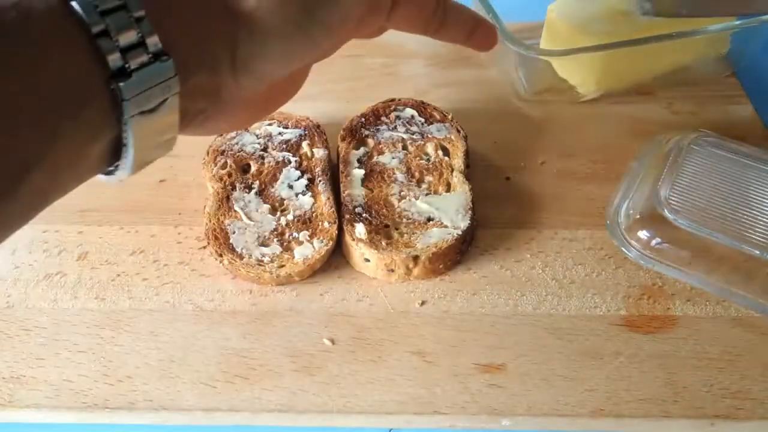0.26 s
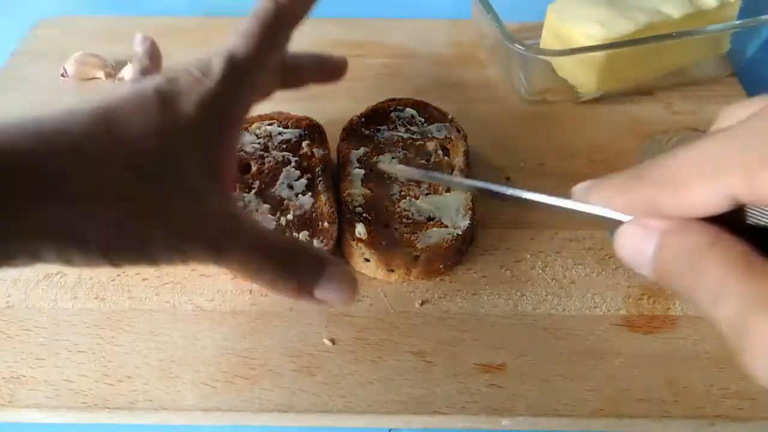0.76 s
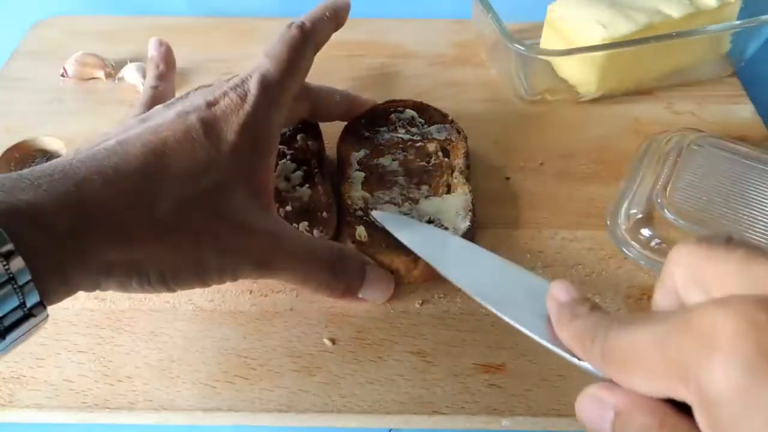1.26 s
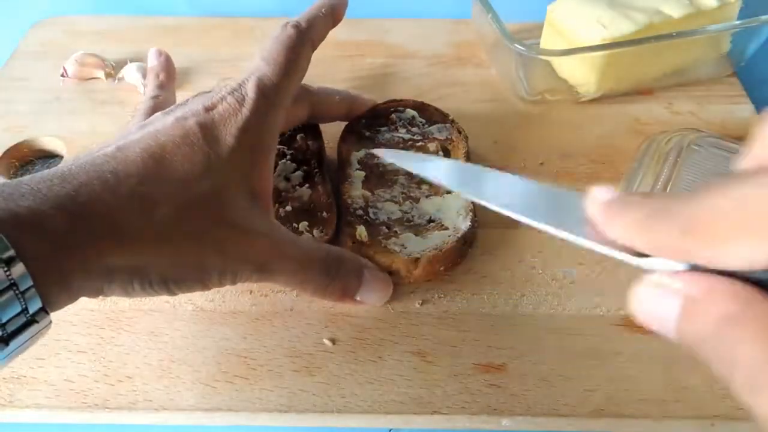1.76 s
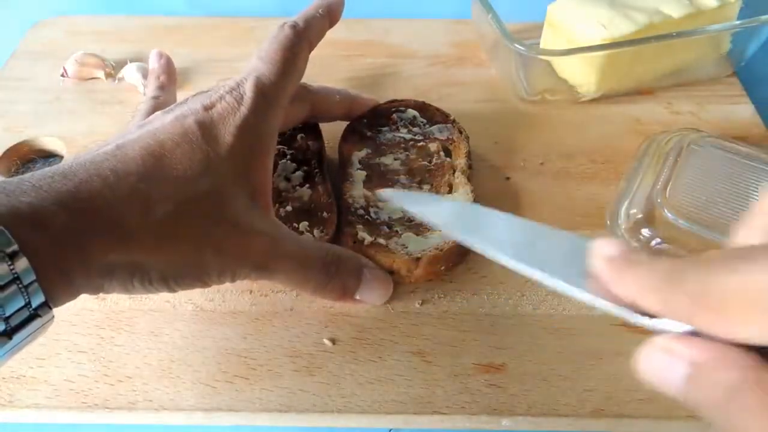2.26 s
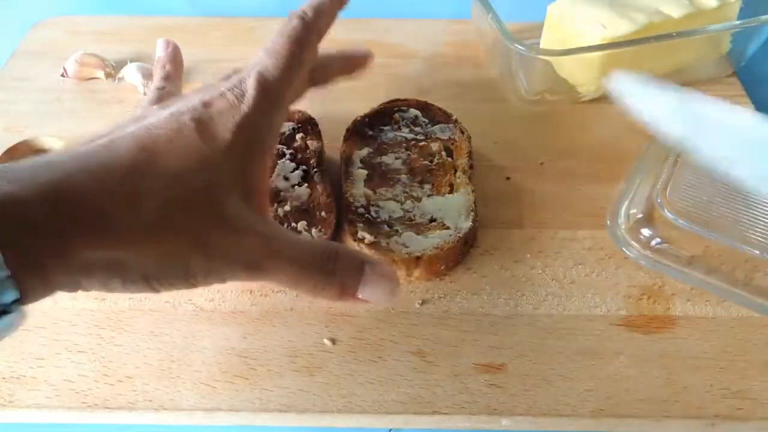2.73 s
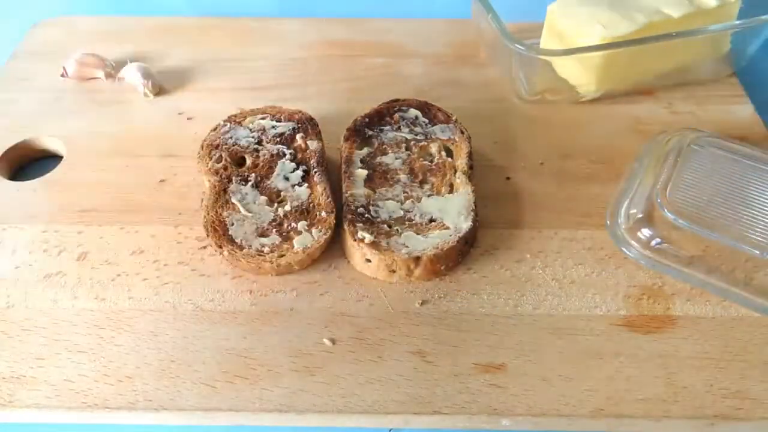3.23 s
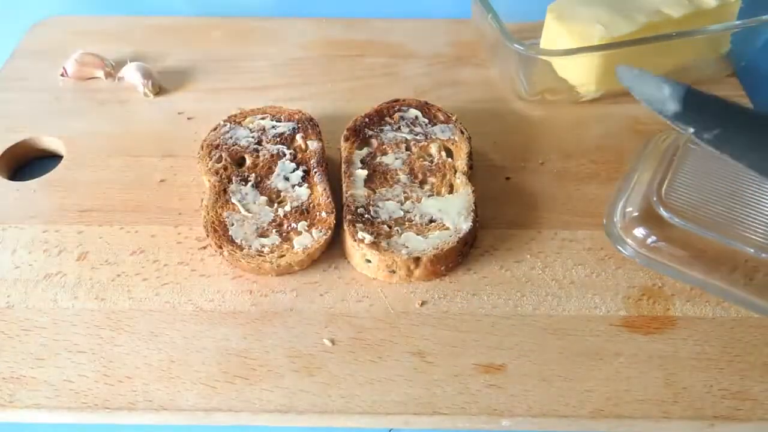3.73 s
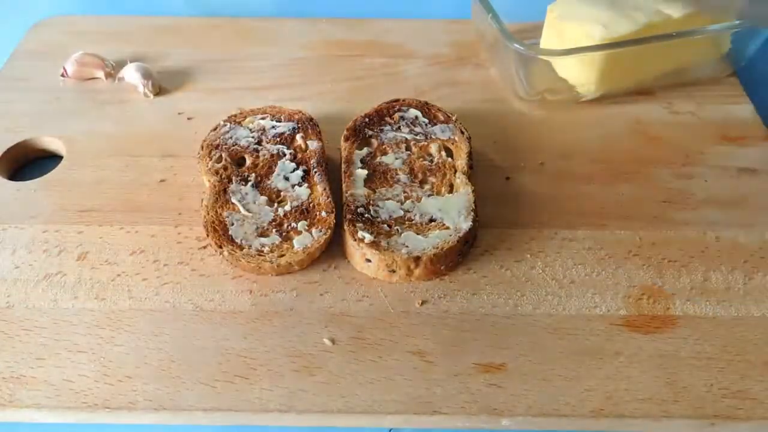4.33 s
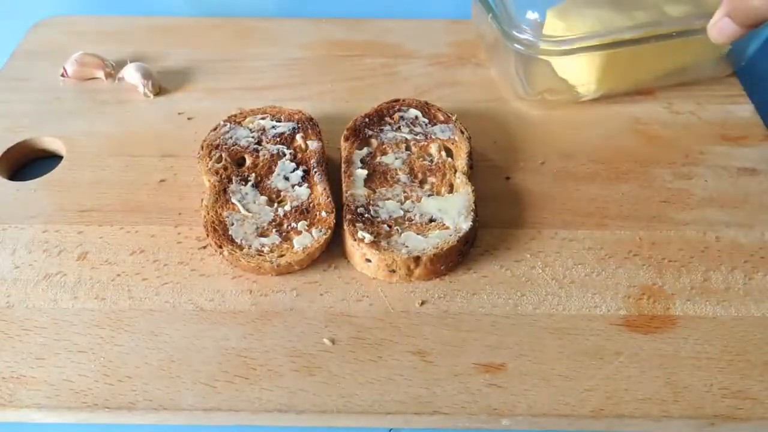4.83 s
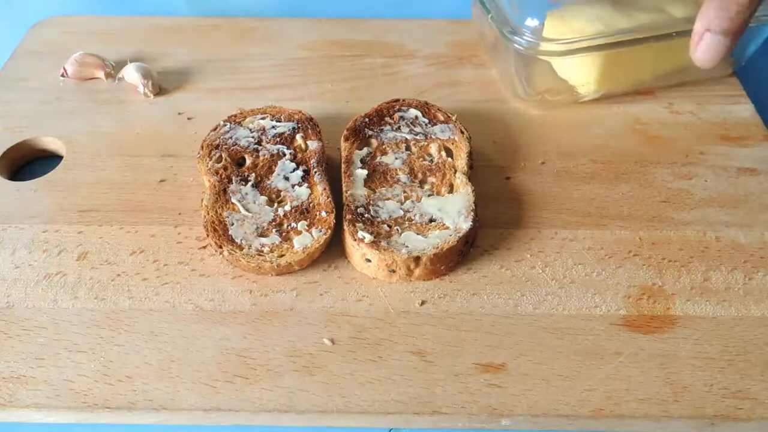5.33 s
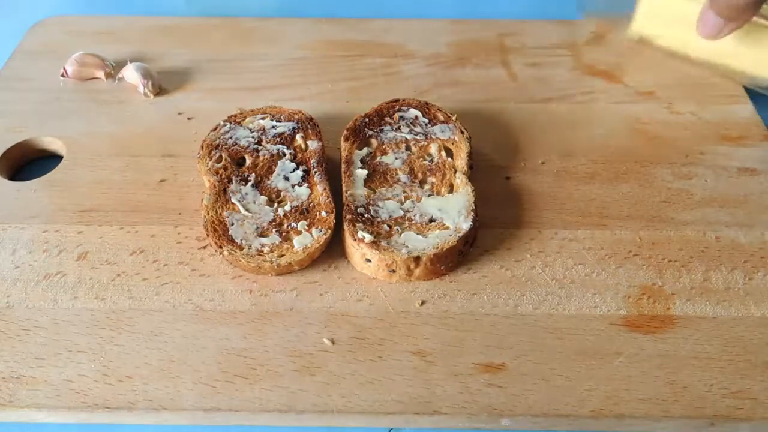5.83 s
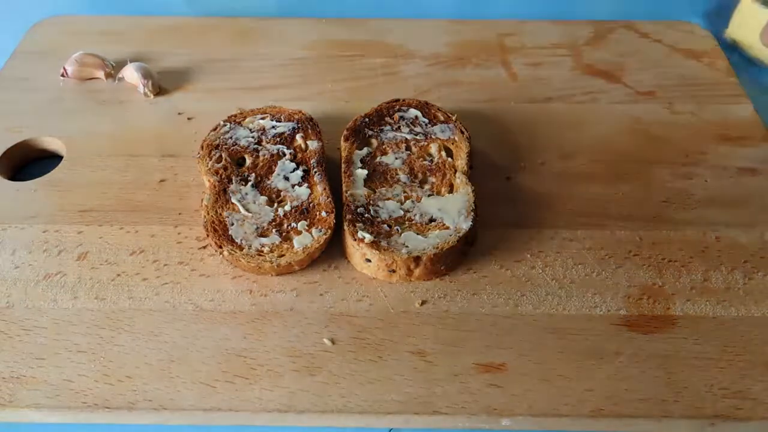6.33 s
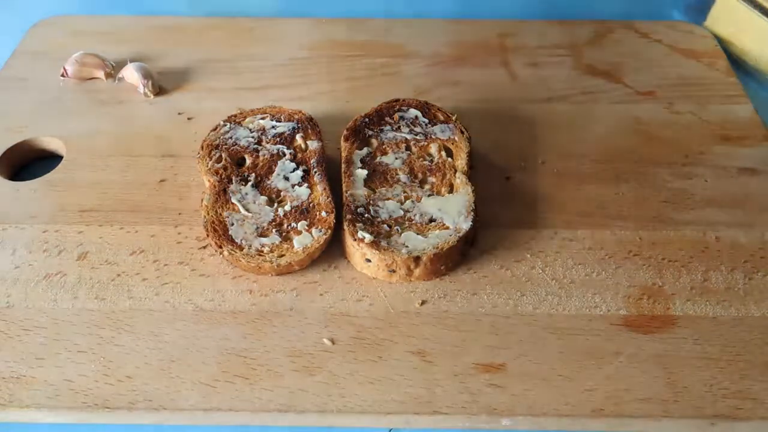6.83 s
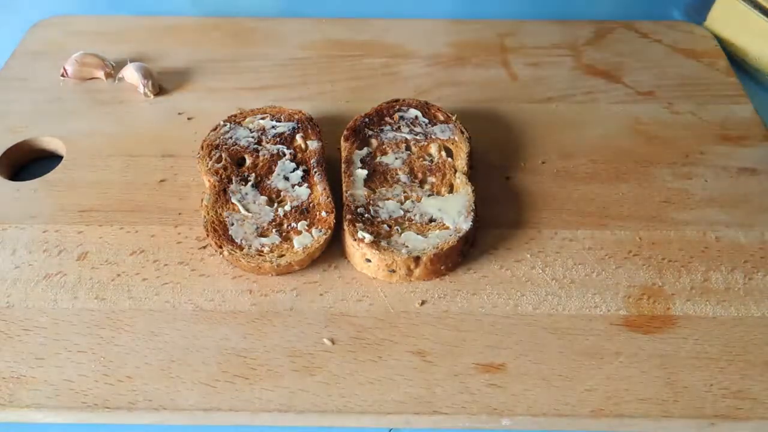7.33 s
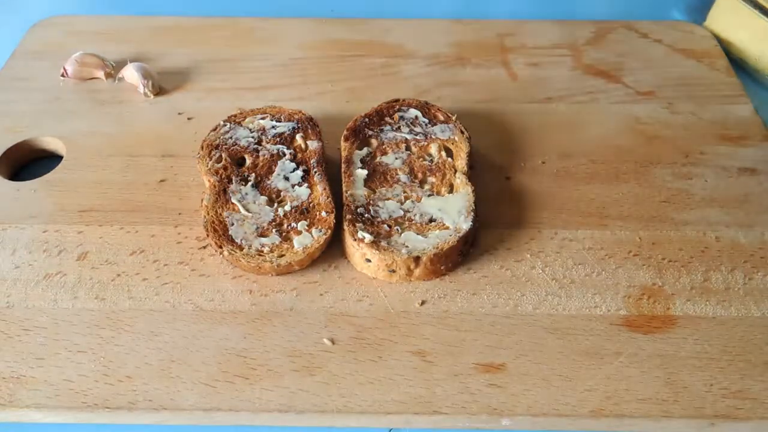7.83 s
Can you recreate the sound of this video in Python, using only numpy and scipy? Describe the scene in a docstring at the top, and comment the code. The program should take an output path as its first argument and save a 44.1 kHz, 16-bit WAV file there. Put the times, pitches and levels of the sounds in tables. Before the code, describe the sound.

Dry, gritty toast scraping, a pause, glass knocking on a wooden board, a bright lid rattle, and hard bumps on a counter in a small kitchen.

```python
"""Buttering toast in a small kitchen

A stereo microphone hears a knife scrape crisp toast on a wooden board: tiny slips of the blade and snapping crumbs.
The glass lid of the butter dish knocks on the board, taps the rim and rattles into its seat: struck modes ring.
The dish bumps down on the counter while something brushes softly; behind lie a faint appliance hum and room air.
Dense reflections surround the near sounds; a limiter flattens the loudest clinks, then a suppressor thins the quiet.
"""
import sys
import numpy as np
from scipy import signal
from scipy.fft import next_fast_len
from scipy.io import wavfile
from scipy.ndimage import uniform_filter1d, minimum_filter1d

SR = 44100
rng = np.random.default_rng(int(sys.argv[2]) if len(sys.argv) > 2 else 0)


def int16_out(signal):
    """Quantize to a 16-bit WAV file."""
    q = np.round(np.clip(np.atleast_2d(signal).T, -1, 1) * 32767)
    wavfile.write(sys.argv[1], SR, q.astype(np.int16))


N = 356323

# All event, mode and spectrum levels are relative: each layer adds its own gain.
# steady air of the kitchen [f/Hz, density/dB]
AIR_SPECTRUM = [(12, -23), (20, -3), (102, -11.5), (167, -9), (202, -13), (361, -9.5), (577, -15.5),
                (974, -16), (2110, -23.5), (2850, -22), (4080, -25.5), (9860, -28.5), (14500, -31.5)]
# spells in which the appliance sounds [start t/s, end t/s, hum level/dB, whine level/dB]
APPLIANCE_SPELLS = [(0, 1.73, -76, -2), (2.55, 3.25, -74, 0.5), (4.3, 5.3, -75.5, 2.5)]
# faint whining lines of the appliance [f/Hz, level/dB]
WHINE_LINES = [(2568, -129), (2616, -92), (2853, -89.5), (2907, -91.5), (3311, -92), (3580, -94.5),
               (3741, -94)]
# decay of the kitchen's reflections [f/Hz, t60/s]
ROOM_DECAY = [(100, 0.76), (260, 0.87), (700, 0.55), (1840, 0.54), (4850, 0.44), (12000, 0.43)]
# side against mid at the microphone [f/Hz, level/dB]
SIDE_LEVEL = [(60, -18), (300, -18), (2000, -17), (4500, -11.5), (8500, -6), (13000, -2)]
# left port minus right port [f/Hz, level/dB]
LEFT_MINUS_RIGHT = [(30, -12), (70, 15.5), (130, 8.5), (260, 1.2), (500, -1.5), (1500, -2.4), (5000, -2.5),
                    (8000, -5), (13000, -6.5)]
# soft rubs of hand and dish [start t/s, length t/s, attack t/s, level/dB, low rasp against it level/dB]
HAND_RUBS = [(.183, 0.083, .012, -80, 18.5), (5.77, 0.032, 0.046, -53, -14),
             (5.887, 0.088, .004, -62.5, -5.5), (6.098, 0.005, 0.0038, -64.5, 8.5),
             (6.31, 0.037, 0.023, -77, 14), (7.235, 0.35, 0.011, -68, -1), (7.48, 0.2, 0.087, -53, -14),
             (7.75, 0.3, 0.034, -69, 3)]
# colour of the rubs and ticks [f/Hz, density/dB]
RUB_SPECTRUM = [(100, -12), (230, 0), (500, -4), (780, -1.5), (1200, -11.5), (2000, -12), (4000, -19),
                (7000, -18.5), (11500, -15.5), (14500, -25)]
# small dry ticks of handling [t/s, level/dB, t60/s]
HANDLING_TICKS = [(7.3945, -55, 0.023), (7.5348, -56, 0.013), (7.7902, -52, 0.012), (7.8742, -52, 0.041),
                  (7.9217, -52, 0.02), (7.9916, -50, 0.012)]
# dish bumping on the counter [t/s, level/dB, hardness as cut-off f/Hz, contact t60/s]
COUNTER_BUMPS = [(5.761, -54, 2560, 0.033), (5.891, -37, 220, 0.041), (5.928, -41.5, 200, 0.053),
                 (5.945, -37.5, 298, 0.034), (6.046, -45, 3100, 0.078), (6.048, -27.5, 517, 0.1),
                 (6.246, -48, 248, 0.071), (6.357, -51, 910, 0.017), (6.567, -17.5, 6440, 0.065),
                 (6.683, -42, 6000, 0.084), (6.697, -32, 5730, 0.039), (6.759, -25.5, 6700, 0.073),
                 (6.863, -41, 6860, 0.018)]
# main modes of the counter [f/Hz, width/Hz, level/dB]
COUNTER_MODES = [(121, 18, -7), (174, 30, 2), (288, 32, -3.5), (342, 17, 3), (460, 55, -23),
                 (698.5, 31, 7.5), (1448, 110, 3.5), (1760, 34, -18), (2430, 74, -18), (2885, 200, -7.5)]
# crowd of weak counter modes [f/Hz, density/dB]
COUNTER_CROWD = [(35, -33), (75, -12), (140, 2), (320, -1), (500, 0), (720, -6), (1000, -7.5), (1500, -8),
                 (3000, -11), (5000, -20), (13000, -20)]
# glassware knocking on the board [t/s, level/dB, hardness as cut-off f/Hz, contact t60/s]
KNOCKS = [(3.885, -20.5, 5200, 0.035), (4.112, -27.5, 1070, 0.062), (7.535, -42.5, 990, 0.08),
          (7.556, -48, 895, 0.045), (7.638, -47.5, 950, 0.054), (7.793, -51, 1210, 0.049)]
# main modes of the board [f/Hz, width before damping/Hz, level/dB]
BOARD_MODES = [(153, 21, -0.5), (258, 37, -9), (654, 14, 6.5), (720, 32, -9), (893, 74, 0.5),
               (990, 17, -35), (1124, 50, -5), (1480, 16, 2), (1824, 85, -6.5), (1900, 28, -33),
               (2620, 48, -24), (3390, 76, -6.5)]
# crowd of weak board modes [f/Hz, density/dB]
BOARD_CROWD = [(50, -27), (150, -9.5), (270, -8), (550, -5), (850, 10), (1100, 0), (1900, -0.5),
               (3200, -10), (5000, -17.5), (14000, -19.5)]
# lid tapping the rim of the dish [t/s, level/dB, hardness as cut-off f/Hz, contact t60/s]
RIM_TAPS = [(5.025, -17.5, 11100, 0.044), (5.127, -25, 6040, 0.15), (5.204, -28, 6900, 0.085),
            (5.509, -34.5, 8150, 0.13)]
# main modes of the lid [f/Hz, width/Hz, level/dB]
LID_MODES = [(867, 40, -5), (1370, 48, -6), (1780, 62, -8), (2310, 41, -6), (2570, 38, 0), (2920, 49, -9),
             (3220, 44, -1), (3710, 70, -11), (4050, 120, -5), (4910, 25, -13), (5250, 66, -5),
             (5750, 28, -16), (6410, 47, -11), (7000, 36, -15), (7630, 40, -14), (8960, 56, -16),
             (10400, 30, -21), (11900, 79, -24), (13500, 42, -32)]
# crowd of weak lid modes [f/Hz, density/dB]
LID_CROWD = [(60, -32), (170, -8.5), (800, -4), (2700, -1), (4200, -9.5), (7000, -10.5), (14500, -13.5)]
# lid dropping into its seat [t/s, level/dB, hardness as cut-off f/Hz, contact t60/s]
LID_SEATINGS = [(5.310, -16.5, 14600, 0.032), (5.361, -17, 10000, 0.016), (5.392, -18.5, 18000, 0.024),
                (5.401, -16.5, 18400, 0.046)]
# main modes of the dish [f/Hz, width/Hz, level/dB]
DISH_MODES = [(646, 97, -8), (1730, 53, -10), (2210, 71, -11), (2620, 92, -5), (3240, 56, 0),
              (3820, 30, -9), (3960, 33, -9), (4340, 68, -8), (5100, 44, -5), (5260, 23, -10),
              (5780, 42, 0), (6130, 54, -8), (6980, 28, -14), (7350, 41, -12), (7710, 120, -9),
              (8870, 42, -9), (9580, 62, -15), (10400, 44, -8), (11300, 34, -11), (11600, 24, -15),
              (11800, 36, -10), (12300, 120, -21), (13500, 61, -16)]
# crowd of weak dish modes [f/Hz, density/dB]
DISH_CROWD = [(60, -13), (170, -1.5), (600, -1), (1200, -2.5), (3000, 0.5), (6000, -1), (12000, -9),
              (14500, -13)]
# blade strokes on toast [start t/s, length t/s, attack t/s, level/dB, low rasp against it level/dB]
BLADE_STROKES = [(.79, 0.15, 0.061, -66.5, -21), (1.155, 0.24, 0.013, -59, 1.5),
                 (1.41, 0.29, 0.13, -59.5, 2.5), (1.73, 0.13, 0.017, -63, 0.5),
                 (2.168, 0.083, 0.0053, -65, -3), (2.262, 0.035, 0.016, -49, -12),
                 (2.574, .16, 0.051, -56, -11), (3.3, 0.29, 0.067, -67.5, -13)]
# colour of the crust [f/Hz, density/dB]
CRUST_SPECTRUM = [(150, -13), (350, -18), (680, -4), (1100, -9.5), (2200, -5), (3500, -1), (5000, -6),
                  (6500, -5.5), (8000, -2.5), (9000, -6), (10700, 3), (11800, -1.5), (12900, 3),
                  (14500, -14.5)]
# larger crumbs snapping under the blade [t/s, level/dB, t60/s]
CRUMB_CRACKS = [(1.2261, -34, 0.028), (1.2815, -43.5, 0.064), (1.3379, -43.5, 0.03), (1.4451, -44, 0.026),
                (1.4701, -40, 0.025), (1.4834, -40.5, .028), (1.5983, -29, 0.02), (1.6616, -36, 0.024),
                (1.7355, -27.5, 0.022), (2.172, -41, 0.026), (2.2144, -37.5, 0.063), (2.2448, -36, .026),
                (2.2697, -23.5, 0.028), (2.2754, -40, 0.024), (2.3012, -33.5, 0.036), (2.3396, -40.5, .018),
                (2.5785, -36, 0.035), (2.5874, -33, 0.021), (2.612, -35, 0.017), (2.6294, -34.5, 0.039),
                (2.6609, -34, 0.017), (3.4154, -48.5, 0.07)]

AIR_DB, HUM_HZ = -69, 357
SPELL_FADE_DB_PER_S, IDLE_DB = 80, -23  # between spells the appliance sinks to a faint idle
# pressure sags once a stroke has taken hold; the release adds to that after its length is over
RUB_SAG_DB_PER_S, RUB_RELEASE_DB_PER_S = 23.5, 190
STROKE_SAG_DB_PER_S, STROKE_RELEASE_DB_PER_S = 32, 203
GLASS_BODY_DB, BOARD_DAMPING = -24, 1.15
CRUMB_DB, CRUMB_SPREAD_DB, CRUMB_T60_S = 7, 3, 0.022  # small crumbs: mean level above the stroke's, spread
CRUMB_DULLING, MIDDLING_CRUMB_DB = 0.06, -40  # bigger is duller: dB per octave for each dB above middling
CEILING_DB, EDGE_HZ = -18.2, 14500  # limiter threshold, upper band edge


def gain_of(db):
    """Decibels to an amplitude factor."""
    return 10 ** (np.asarray(db) / 20)


def evened(x):
    """Scaled to rms 1 over all its values."""
    return x / np.sqrt(np.mean(x ** 2) + 1e-20)


def read(points, hz):
    """A table's value, interpolated on a log-frequency axis."""
    f, value = np.transpose(points)
    return np.interp(np.log(hz + 1), np.log(f + 1), value)


def add(mix, s, sound):
    """Lays a sound into the mix at time s."""
    part = mix[round(s * SR):][:len(sound)]
    part += sound[:len(part)]


def colour(x, points, size=2048):
    """Causal minimum-phase filter with the given (f/Hz, level/dB) shape."""
    shape_db = np.maximum(read(points, abs(np.fft.fftfreq(size, 1 / SR))), -100)
    log_gain = np.log(gain_of(shape_db))
    taps = np.fft.ifft(np.exp(np.conj(signal.hilbert(log_gain)))).real
    return signal.oaconvolve(x, taps[:size // 2])[:len(x)]


def lowpass(x, hz, order=2):
    """Smooth roll-off above hz."""
    return signal.sosfilt(signal.butter(order, min(hz, .49 * SR), fs=SR, output="sos"), x)


def wander(rate_hz):
    """Slow random drift of rms 1, with rate_hz new values a second."""
    knots = rng.standard_normal(N // 100)
    return evened(np.interp(np.arange(N) * rate_hz / SR, np.arange(len(knots)), knots))


def air(side_db=-3.0, hiss_hz=9900, hiss_width_hz=170, hiss_db=-87, swell_db=0.34):
    """Dull room noise with a thin, wavering band of hiss high up."""
    t = np.arange(N) / SR
    mid, side = (evened(colour(rng.standard_normal(N), AIR_SPECTRUM, size=8192)) for _ in range(2))
    side = gain_of(side_db) * side
    # slow noise on a carrier becomes a narrow band
    slow_noise = lowpass(rng.standard_normal((2, N)), hiss_width_hz)
    hiss = evened(slow_noise * np.cos(2 * np.pi * hiss_hz * t))
    swell = gain_of(AIR_DB + swell_db * wander(1.5))
    room = swell * np.array([mid + side, mid - side])
    return room + gain_of(hiss_db + 2 * wander(2.7)) * hiss


def appliance(hum_db=-1, whine_db=3.0, waver_hz=2.42, flicker_db=4.0):
    """A hum and faint whining lines, each wavering in pitch, that swell together in spells."""
    t = np.arange(N) / SR

    def tone(hz):
        """A sine of rms 1 whose frequency wavers."""
        return np.sqrt(2) * np.sin(2 * np.pi * np.cumsum(hz + waver_hz * wander(25.2)) / SR)

    start, end, hum_level, whine_level = np.transpose(APPLIANCE_SPELLS)[:, :, None]
    away_s = np.maximum(np.maximum(start - t, t - end), 0)
    fade_db = np.maximum(-SPELL_FADE_DB_PER_S * away_s, IDLE_DB)
    hum = gain_of(hum_db + (hum_level + fade_db).max(0)) * tone(HUM_HZ)
    whine = sum(gain_of(db + flicker_db * wander(3.2)) * tone(hz) for hz, db in WHINE_LINES)
    return hum + gain_of(whine_db + (whine_level + fade_db).max(0)) * whine


def kitchen(x, wet_db, delay=0.00059):
    """Mid and side of a sound in the room: dense reflections, each band dying at its own speed."""
    hz, t, z = signal.stft(rng.standard_normal((2, SR)), SR, nperseg=256)
    decay = gain_of(-60 * t / read(ROOM_DECAY, hz)[:, None])
    tail = signal.istft(z * decay, SR, nperseg=256)[1]
    # silent until the delay (s), then rising over as long again
    tail *= np.clip(np.arange(tail.shape[1]) / SR / delay - 1, 0, 1)
    echoes = signal.fftconvolve(x[None], tail / np.linalg.norm(tail[0]), axes=1)[:, :N]
    # the direct sound reaches the two ports with a small phase difference
    quadrature = signal.hilbert(x, next_fast_len(N))[:N].imag
    mid = x + gain_of(wet_db) * echoes[0]
    side = 0.71 * quadrature + gain_of(wet_db + 2) * echoes[1]
    return np.array([mid, side])


def ports(mid, side):
    """Two microphone ports, left and right: their treble differs, and most of the bass leans left."""
    side = colour(side, SIDE_LEVEL)

    def port(sign):
        """Mid plus or minus side, with half of the left-right difference."""
        return colour(mid + sign * side, [(hz, sign * db / 2) for hz, db in LEFT_MINUS_RIGHT])

    return np.array([port(1), port(-1)])


def pressure(start, length, attack, sag_db_per_s, release_db_per_s):
    """One stroke: it takes hold, eases off slowly and is lifted."""
    t = np.arange(N) / SR - start
    eased_db = sag_db_per_s * np.maximum(t - attack, 0) + release_db_per_s * np.maximum(t - length, 0)
    return np.clip(t / attack, 0, 1) * gain_of(-eased_db)


def friction(strokes, sag_db_per_s, release_db_per_s, spectrum, grains_per_s, spread_db,
             split_hz, high_db, low_db):
    """Countless tiny slips of uneven size follow each stroke's pressure, with its own share of low rasp."""
    sizes = gain_of(spread_db * np.minimum(rng.exponential(1, N), 4))
    slips = sizes * rng.choice([-1, 1], N) * (rng.random(N) < grains_per_s / SR)
    grit = colour(slips, spectrum)
    low = evened(lowpass(grit, split_hz))
    high = evened(signal.sosfilt(signal.butter(2, split_hz, "high", fs=SR, output="sos"), grit))
    out = np.zeros(N)
    for start, length, attack, db, rasp_db in strokes:
        press = gain_of(db) * pressure(start, length, attack, sag_db_per_s, release_db_per_s)
        out += press * (gain_of(high_db) * high - gain_of(low_db + rasp_db) * low)
    return out


def snaps(rows, spectrum, level_db, tilt_db, variety_db, lead_s):
    """Brittle breaks: each a noise burst that builds briefly and dies, with its own colour."""
    t = np.arange(3000) / SR - .005  # the break itself is at zero
    out = np.zeros(N)
    for s, db, t60 in rows:
        slope = tilt_db - CRUMB_DULLING * (db - MIDDLING_CRUMB_DB)  # dB per octave
        own_colour = [(hz, shape + slope * np.log2(hz / 4000) + variety_db * rng.standard_normal())
                      for hz, shape in spectrum]
        swell_db = -60 * np.maximum(t / max(t60, .002), -t / lead_s)
        burst = colour(rng.standard_normal(len(t)) * gain_of(swell_db), own_colour)
        size = np.sqrt(np.sum(burst ** 2) / (t60 * SR / 10))
        add(out, s + t[0], gain_of(db + level_db) * burst / size)
    return out


def blows(rows, modes, body, ring_db, body_db, push_db, damping, chatter_s, tilt_db):
    """Each blow rings the main modes over a brief crowd of weak ones; a soft contact leaves out the treble."""
    t, out = np.arange(SR // 5) / SR, np.zeros(N)
    hz, width, mode_db = np.transpose(modes)[:, :, None]
    # the surfaces chatter against each other for a moment before the object rings free
    free = np.maximum(t - chatter_s, 0)
    strength = gain_of(mode_db + tilt_db * np.log2(hz / 3000)) * np.sqrt(width)
    rings = strength * np.exp(-np.pi * damping * width * free)
    # the object's weight gives one low push
    push = gain_of(push_db) * lowpass(signal.unit_impulse(len(t)), 1600, order=1)
    for s, db, hard_hz, t60 in rows:
        # the point of contact decides how strongly each mode is struck
        struck = gain_of(2.5 * rng.standard_normal(hz.shape))
        ring = (struck * rings * np.sin(2 * np.pi * (hz * t + rng.random(hz.shape)))).sum(0)
        chatter = rng.standard_normal(len(t)) * gain_of(-60 * free / t60)
        crowd = colour(chatter / np.linalg.norm(chatter) + push, body)
        blow = gain_of(ring_db) * evened(ring) + gain_of(body_db) * evened(crowd)
        add(out, s, gain_of(db) * lowpass(blow, hard_hz))
    return out


def handling():
    """Soft rubs of hand and dish as dense fine friction, with small dry ticks."""
    rubs = friction(HAND_RUBS, RUB_SAG_DB_PER_S, RUB_RELEASE_DB_PER_S, RUB_SPECTRUM, grains_per_s=3000,
                    spread_db=3.0, split_hz=3800, high_db=-4.5, low_db=-4)
    return rubs + snaps(HANDLING_TICKS, RUB_SPECTRUM, level_db=2, tilt_db=5.0, variety_db=6.0, lead_s=0.0042)


def dish_on_counter():
    """The dish bumps down and the counter's modes answer."""
    return blows(COUNTER_BUMPS, COUNTER_MODES, COUNTER_CROWD, ring_db=-22, body_db=-18.0, push_db=-6,
                 damping=1.0, chatter_s=0.004, tilt_db=1.0)


def glass_on_board():
    """Glassware knocks the wooden board, whose broad modes die quickly."""
    return blows(KNOCKS, BOARD_MODES, BOARD_CROWD, ring_db=-28.0, body_db=-19.0, push_db=-2.0,
                 damping=BOARD_DAMPING, chatter_s=0.0056, tilt_db=1)


def lid_on_dish():
    """Taps on the rim ring the lid's modes; dropping into its seat rings those of the dish."""
    taps = blows(RIM_TAPS, LID_MODES, LID_CROWD, ring_db=-20.5, body_db=GLASS_BODY_DB, push_db=-10,
                 damping=1.0, chatter_s=0.0068, tilt_db=1.4)
    seatings = blows(LID_SEATINGS, DISH_MODES, DISH_CROWD, ring_db=-23.5, body_db=GLASS_BODY_DB, push_db=-6.5,
                     damping=1, chatter_s=0.013, tilt_db=2.7)
    return taps + seatings


def crumbs(strokes, count=3):
    """Rows [t/s, level/dB, t60/s] of small breaks at random between each stroke's attack and lift."""
    rows = []
    for start, length, attack, db, _ in strokes:
        places, sizes = rng.random(count), rng.standard_normal(count)
        for place, size in zip(places, sizes):
            s = start + attack + (length - attack) * place
            rows.append((s, db + CRUMB_DB + CRUMB_SPREAD_DB * size, CRUMB_T60_S))
    return rows


def toast():
    """The blade slips over the crust in strokes while large and small crumbs snap."""
    scrape = friction(BLADE_STROKES, STROKE_SAG_DB_PER_S, STROKE_RELEASE_DB_PER_S, CRUST_SPECTRUM,
                      grains_per_s=1200, spread_db=2.0, split_hz=1900, high_db=-3.5, low_db=-10.5)
    breaks = CRUMB_CRACKS + crumbs(BLADE_STROKES)
    return scrape + snaps(breaks, CRUST_SPECTRUM, level_db=-8.5, tilt_db=1.0, variety_db=2.5, lead_s=0.0057)


def scene():
    """Toast, glassware and handling in the room, heard at both ports over the hum and air."""
    sound = kitchen(toast() + handling(), wet_db=-9.5)
    sound += kitchen(glass_on_board(), wet_db=-8.5)
    sound += kitchen(lid_on_dish(), wet_db=-11)
    sound += kitchen(dish_on_counter(), wet_db=-10)
    return ports(*sound) + appliance() + air()


def suppress(x, cap_db=-52, memory_s=0.26, share_db=-13):
    """A noise suppressor: loud passages raise its guess of the noise, so the quiet after them sinks a little."""
    power = abs(uniform_filter1d((x ** 2).mean(0), size=1500)) + 1e-14
    keep = np.exp(-1 / (memory_s * SR))
    noise = signal.lfilter([1 - keep], [1, -keep], np.minimum(power, gain_of(cap_db) ** 2))
    return x * np.sqrt(power / (power + gain_of(share_db) ** 2 * noise))


def record(dry, recovery_db_per_s=600):
    """A fast limiter holds down the peaks; then noise suppression and the band limit."""
    peak_db = 20 * np.log10(abs(lowpass(dry, EDGE_HZ, order=8)).max(0) + 1e-9)
    # hold each peak for about 1 ms, let go at the recovery speed, then smooth
    over_db = -minimum_filter1d(-np.maximum(peak_db - CEILING_DB, 0), size=45)
    fall = np.arange(N) * recovery_db_per_s / SR
    reduction_db = np.maximum.accumulate(over_db + fall) - fall
    limited = dry / gain_of(uniform_filter1d(reduction_db, size=45))
    band = signal.firwin(255, EDGE_HZ, window=("kaiser", 8), fs=SR)
    return signal.oaconvolve(suppress(limited), band[None], "same")


dry = scene()
out = record(dry)
int16_out(out)
```